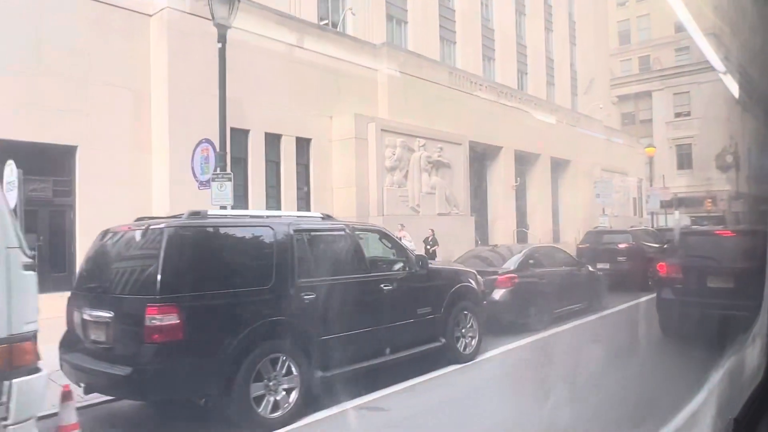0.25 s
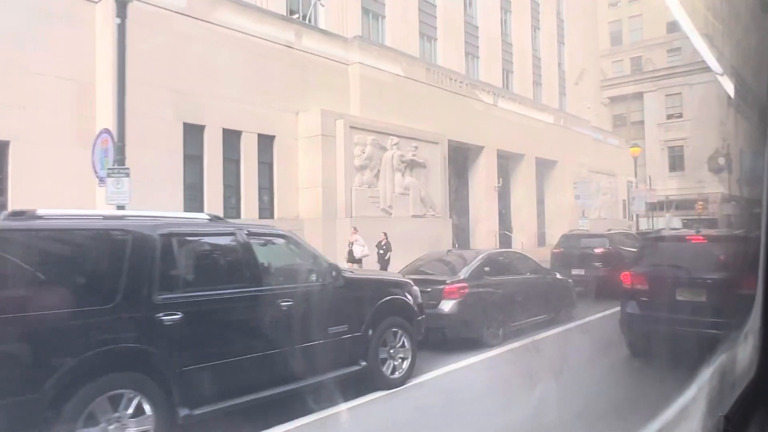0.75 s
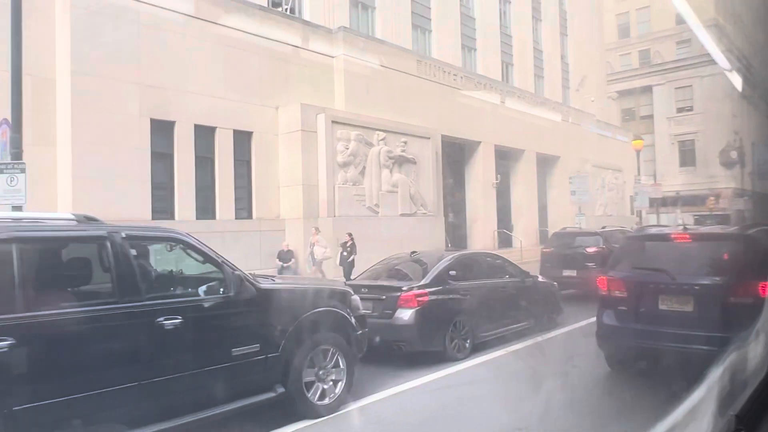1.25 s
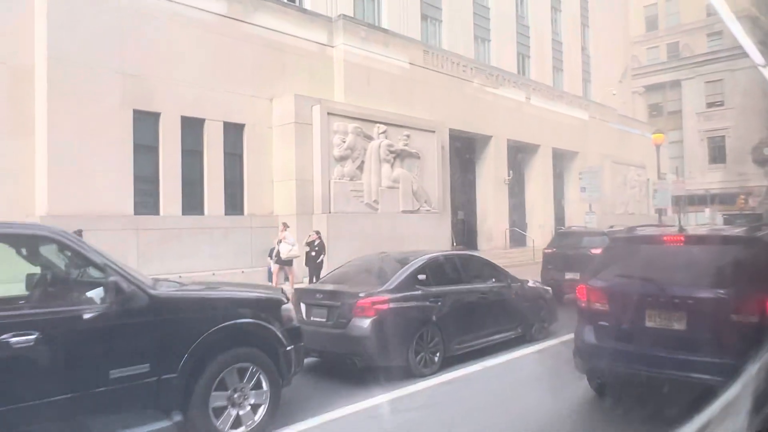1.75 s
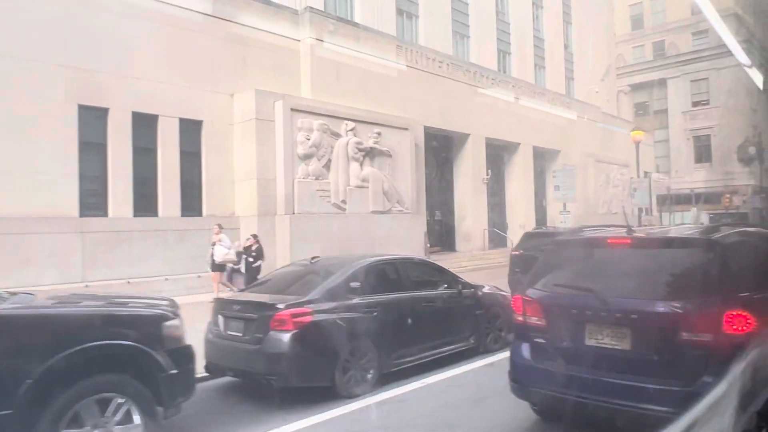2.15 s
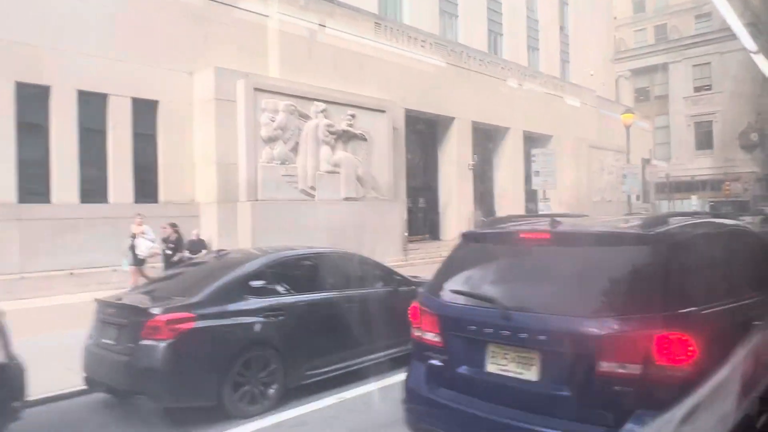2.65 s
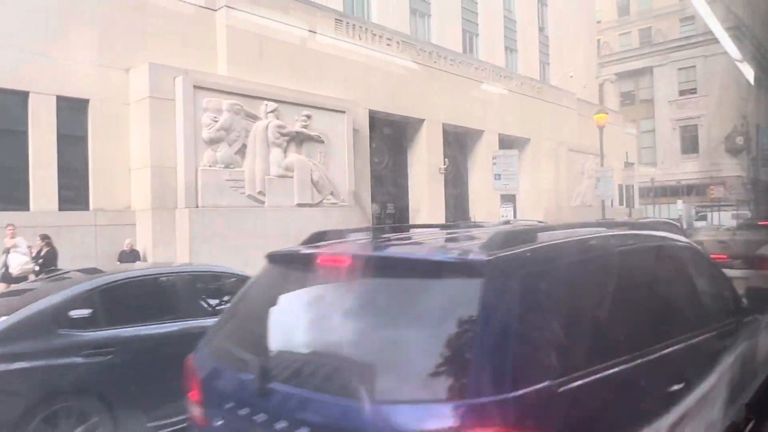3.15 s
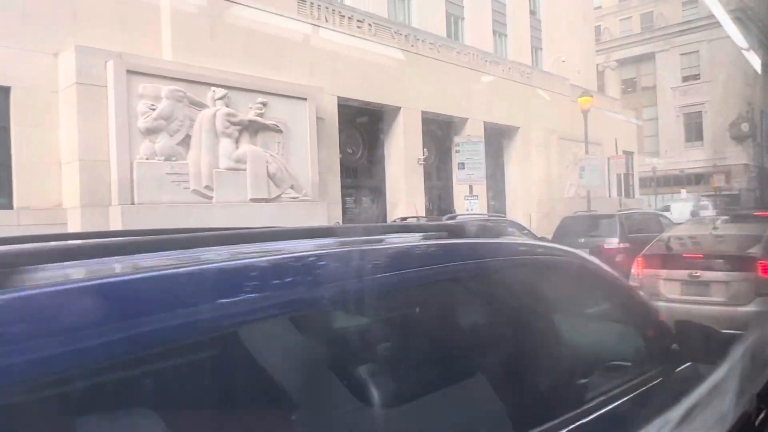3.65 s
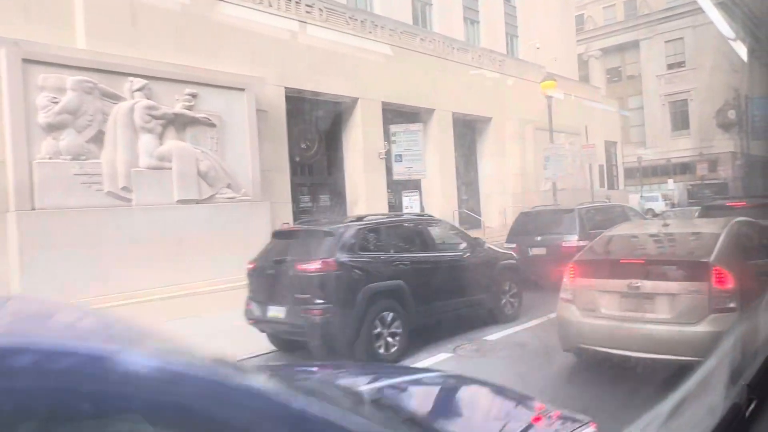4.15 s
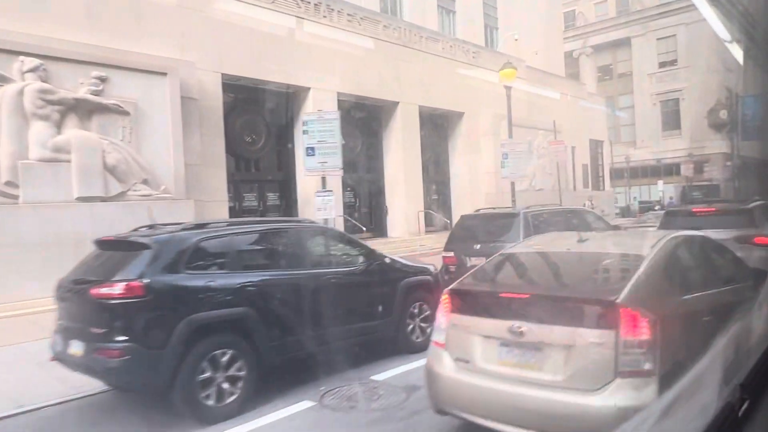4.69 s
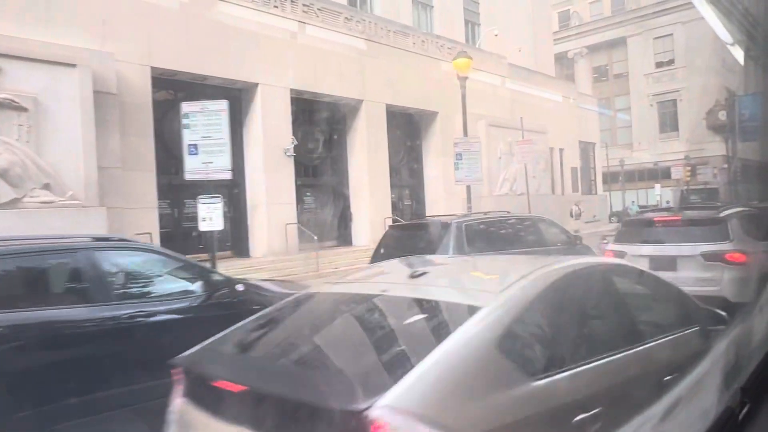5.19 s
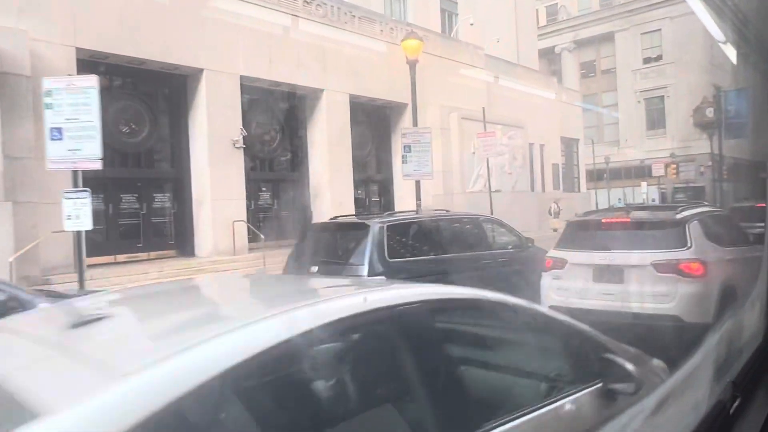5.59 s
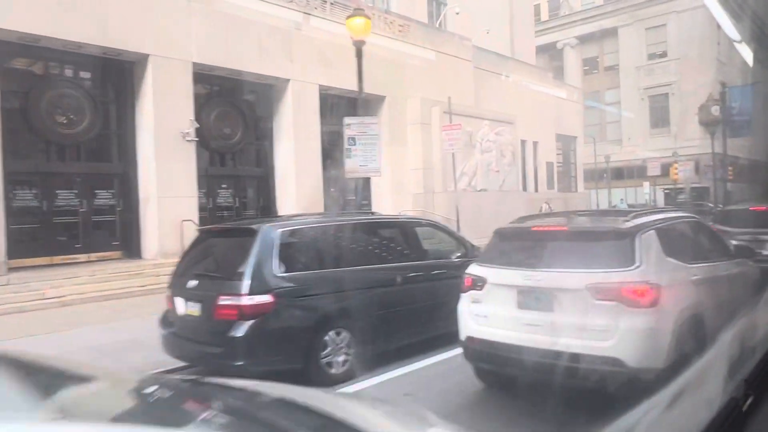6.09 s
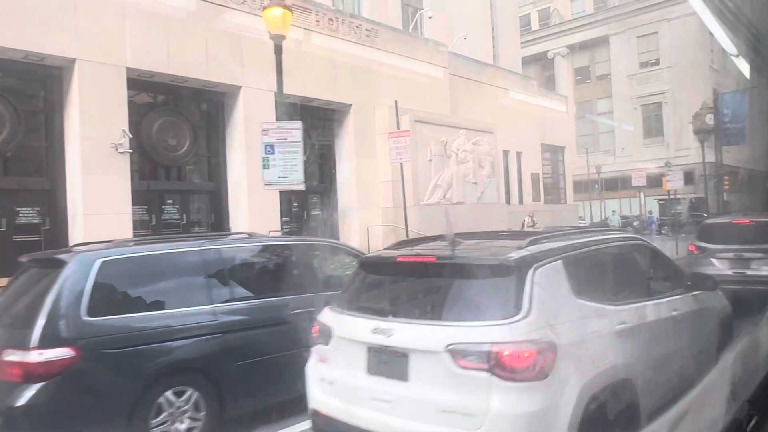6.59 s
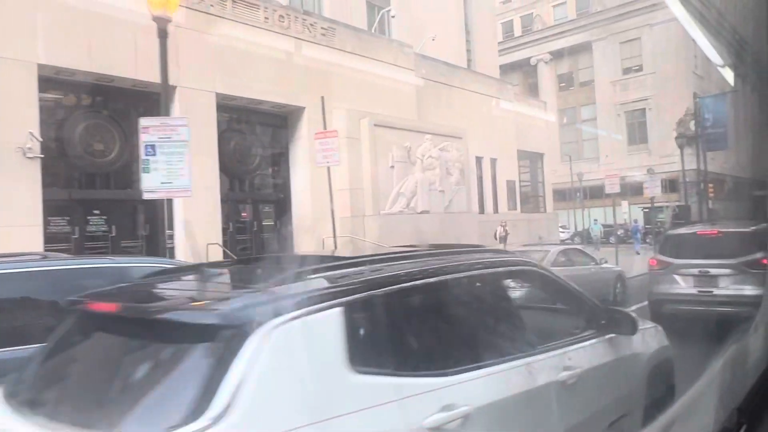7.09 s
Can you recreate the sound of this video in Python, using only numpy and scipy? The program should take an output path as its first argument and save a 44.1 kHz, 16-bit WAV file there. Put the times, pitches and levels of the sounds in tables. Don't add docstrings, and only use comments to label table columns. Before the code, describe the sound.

Deep bus engine rumble rises in pitch and loudness, peaks around the middle, then sinks away, with rattling panels and sizzling trim.

```python
import sys
import numpy as np
from scipy import signal
from scipy.fft import rfft, irfft, next_fast_len
from scipy.io import wavfile
from scipy.ndimage import uniform_filter1d

SR = 44100
rng = np.random.default_rng(int(sys.argv[2]) if len(sys.argv) > 2 else 0)


def store_wav(level_fs):
    pcm = np.round(np.clip(np.atleast_2d(level_fs), -1, 1) * 32767)
    wavfile.write(sys.argv[1], SR, pcm.T.astype(np.int16))


def natural_amplitude(level_db):
    exponent = np.asarray(level_db, float) / 20
    return 10 ** exponent


N = 323253
TIME = np.arange(N) / SR
SIZE = next_fast_len(N)
HZ = np.arange(SIZE // 2 + 1) * SR / SIZE + 1e-3


def curve(table):
    start_s, value = np.transpose(table)
    return np.interp(TIME, start_s, value)


def across(table):
    freq_hz, value = np.transpose(table)
    return np.interp(np.log(HZ), np.log(np.maximum(freq_hz, 1)), value)


def bumps(hz, modes):
    return sum(gain / np.sqrt(1 + (2 * (hz - centre) / width) ** 2) for centre, width, gain in modes)


def unit_rms(x):
    return x / np.sqrt(np.mean(x ** 2))


def walk(rate):
    hold = int(SR / rate)
    steps = np.repeat(rng.standard_normal(N // hold + 1), hold)
    return 2.02 * uniform_filter1d(uniform_filter1d(steps, hold), hold)[:N]


def tone(turns):
    return np.sqrt(2) * np.sin(2 * np.pi * (turns + rng.random((3, 1))))


def restless(x, gain, lo_hz, slow_db, quick_db, count):
    place = np.clip(1.5 * np.log2(HZ / lo_hz), 0, count - 1)
    spectrum = rfft(x, SIZE) * gain
    out = 0
    for k in range(count):
        overlap = np.sqrt(np.clip(1 - abs(place - k), 0, 1))
        band = irfft(spectrum * overlap, SIZE)[:, :N]
        out = out + natural_amplitude(slow_db * walk(5) + quick_db * walk(18)) * band
    return unit_rms(out)


def boom(hz, turns, rumble_db):
    load = curve([(0, -3.2), (1.2, -2.4), (1.5, -2), (1.85, -.5), (2.2, .2), (2.6, .2), (2.8, 1.7),
                  (3.05, 2.8), (3.4, 6.1), (3.7, 5.5), (4, .4), (4.6, 1.7), (5.2, 1), (5.5, -4.5),
                  (6.05, -1.6), (6.4, -2.7), (6.9, -1.3), (7.33, -1.2)])
    # sixths of the firing rate, level_db, follow (dB gained per dB of load)
    strong = [(6, -.3, .85), (9, -11.5, 2.9), (11, -7.8, 2), (12, .7, 3.4)]
    # sixths of the firing rate, level_db
    uneven = [(4, -23.5), (5, -15.5), (7, -11.5), (8, -14), (10, -6), (13, -9.5), (14, -5), (15, -18.5),
              (16, -14), (17, -12.5), (18, -3.5), (20, -14.5), (21, -5.5)]
    # freq_hz, width_hz, level_db, sign at the window
    long_modes = [(52.9, 5.3, -21.2, 1), (70.2, 7.8, -12.2, 1), (114.7, 18.8, -20.6, -1),
                  (125.3, 3.8, -16.7, -1), (147.9, 6.8, -28.7, 1)]
    # freq_hz, width_hz, level_db
    air_modes = [(65, 9.6, -1), (137.3, 15.7, 2.5), (196.4, 11, -4.5), (253, 25, -14), (315, 21, -21)]

    out = 0
    for sixth, level_db, follow in strong:
        order = sixth / 6
        response = 0
        for mode_hz, width_hz, mode_db, sign in long_modes:
            response = response + sign * natural_amplitude(mode_db) / (1 + 2j * (order * hz - mode_hz) / width_hz)
        gain = natural_amplitude(level_db + follow * load + .5 * walk(11)) * abs(response)
        out = out + gain * tone(order * turns)

    air = [(mode_hz, width_hz, natural_amplitude(mode_db)) for mode_hz, width_hz, mode_db in air_modes]
    for sixth, level_db in uneven:
        order = sixth / 6
        gain = natural_amplitude(level_db + rumble_db - 4 + 1.3 * load + walk(3.71)) * bumps(order * hz, air)
        out = out + gain * tone(order * turns)
    return out


def clatter(turns, db):
    # freq_hz, level_db per Hz
    spectrum = [(260, -14.5), (450, 1), (738, -7), (880, -7.5), (956, -10.5), (1300, -12.5), (2150, -20.5),
                (2820, -28.5), (7500, -40), (9750, -74.5), (16500, -120)]
    # freq_hz, width_hz, lift_db (negative is a dip)
    panels = [(557, 40, 3), (680, 40, -3), (720, 28, 2), (880, 40, -3), (950, 40, 4), (1190, 50, 3),
              (1380, 90, -5), (1465, 60, 5), (1690, 45, 3), (1880, 30, 3), (1965, 60, -4), (2090, 40, 6),
              (2160, 60, 7), (2365, 28, 3), (2580, 50, 4), (3150, 90, 3)]
    burst = 1 + 0.24 * np.exp(-(turns % 1) / 0.53)
    gain = natural_amplitude(across(spectrum) + 1.22 * bumps(HZ, panels))
    noise = burst * rng.standard_normal((3, N))
    return natural_amplitude(db + 6.5) * restless(noise, gain, lo_hz=541, slow_db=0.73, quick_db=1.02, count=6)


def rumble(db):
    # freq_hz, level_db per Hz
    spectrum = [(12, -43), (20, -22), (46, -8), (117, -4), (138, -2), (151, -12), (243, -9), (375, -18),
                (410, -19), (700, -51), (910, -62), (1540, -120)]
    # freq_hz, width_hz, lift_db
    walls = [(125, 14, 1.5), (192.2, 29, 7), (239.3, 9.5, 4.5), (293.7, 56, 4.5), (412.5, 67, 7.5)]
    gain = natural_amplitude(across(spectrum) + bumps(HZ, walls))
    noise = rng.standard_normal((3, N))
    return natural_amplitude(db + 3.5) * restless(noise, gain, lo_hz=61.2, slow_db=0.1, quick_db=1.07, count=5)


def gliding_hums():
    # start_s, length_s, from_hz, to_hz, level_db
    hums = [
        (-.1, .85, 158, 142, -30),
        (-.1, .95, 108, 94, -34),
        (2.7, .6, 149, 169, -23),
        (5.45, .6, 81, 66, -26),
        (2.12, .6, 59.5, 63, -21),
        (5.75, 1.2, 132, 116, -25),
        (6.85, .6, 169, 152, -30),
    ]
    out = 0
    for start_s, length_s, from_hz, to_hz, level_db in hums:
        part = np.clip((TIME - start_s) / length_s, 0, 1)
        hz = from_hz + (to_hz - from_hz) * part
        swell = np.sin(np.pi * part) * natural_amplitude(level_db + 1.5 * walk(8))
        out = out + swell * tone(np.cumsum(hz) / SR)
    return out


def ring(start_s, db, hz, rise_s, t60_s, rough, glide=0):
    out, start = np.zeros((3, N)), int(start_s * SR)
    t = np.arange(min(int(t60_s * SR), N - start)) / SR
    wobble = 1 + rough * uniform_filter1d(rng.standard_normal((3, 2 * SR)), size=12)[:, :len(t)]
    turns = np.cumsum(hz * wobble * 2 ** (glide * t), axis=1) / SR + rng.random((3, 1))
    shape = (1 - np.exp(-t / rise_s)) * np.exp(-np.log(1000) * t / t60_s)
    out[:, start:start + len(t)] = natural_amplitude(db) * shape * np.sin(2 * np.pi * turns)
    return out


def knocks():
    # start_s, level_db (peak), pitch_hz, t60_s, rough (0-1)
    parts = [(.2, -54, 13300, .1, .3), (.28, -48, 4800, .06, .8), (.83, -44, 3900, .22, .95),
             (.845, -53, 3400, .3, .3), (1.69, -46, 3250, .1, .5), (1.703, -37, 5200, .12, .9),
             (1.704, -39, 8500, .08, .9), (1.705, -37, 12500, .05, .6), (1.755, -43, 6000, .06, .2),
             (2.75, -48, 13200, .12, .3), (2.8, -47, 3150, .9, .3), (4.535, -52, 6200, .15, .08),
             (4.61, -48, 3070, .45, .2), (4.82, -43, 3550, .4, .4), (4.94, -48, 3450, .65, .07),
             (5.495, -42, 5100, .35, .4), (5.52, -43, 4620, .08, .12), (5.54, -42, 4620, .08, .12),
             (5.56, -46, 4560, .16, .15), (7.06, -48, 13800, .15, .3)]
    out = ring(1.66, db=-1, hz=74, rise_s=.12, t60_s=.7, rough=0, glide=-2.6)
    for start_s, level_db, pitch_hz, t60_s, rough in parts:
        rise_s = .12 * t60_s ** 1.63
        out = out + ring(start_s, level_db, pitch_hz, rise_s, t60_s, rough)
    return out


def jolts():
    # start_s, level_db, hold_s
    patches = [(0.13, -59, 0.054), (0.453, -61, .03), (.58, -62.5, 0.075), (0.835, -64.5, .06),
               (0.97, -66.5, 0.025), (1.477, -55, 0.038), (1.708, -50, 0.039), (1.961, -56, .04),
               (2.161, -47.5, 0.073), (2.44, -49.5, 0.062), (2.604, -58.5, .12), (2.758, -51, 0.27),
               (3.16, -56.5, 0.11), (3.291, -46.5, 0.18), (3.494, -53.5, 0.21), (3.836, -52, 0.013),
               (3.898, -56.5, 0.27), (4.216, -54.5, 0.11), (4.411, -56.5, 0.027), (4.7, -63.5, 0.17),
               (4.96, -63, 0.17), (5.36, -61, 0.18), (5.69, -62, .01), (5.815, -57, .3), (6.197, -65, .02),
               (6.296, -60, 0.13), (6.53, -56, .04), (6.856, -55.5, 0.086), (6.988, -50, 0.086),
               (7.12, -53, 0.15)]
    quiet_db, rise_db_per_s, fall_db_per_s = -63.5, 219, 134
    power = natural_amplitude(quiet_db) ** 2
    for start_s, level_db, hold_s in patches:
        early = np.maximum(start_s - TIME, 0)
        late = np.maximum(TIME - start_s - hold_s, 0)
        power = power + natural_amplitude(level_db - rise_db_per_s * early - fall_db_per_s * late) ** 2
    return 10 * np.log10(power)


def trim(db):
    # freq_hz, level_db per Hz
    spectrum = [(800, -30.5), (2000, -8), (3500, -3), (5500, -3), (7000, -2), (8000, 0), (9500, 0),
                (11000, -1), (12500, -8.5), (14000, -5), (15700, -12.5)]
    size_db = 2.5 * np.minimum(rng.exponential(size=N), 6)
    clicks = rng.standard_normal((3, N)) * natural_amplitude(size_db)
    decay = np.exp(-1 / (.0006 * SR))
    tail = signal.lfilter([1 - decay], [1, -decay], abs(clicks)) * rng.standard_normal((3, N))
    sizzle = irfft(rfft(clicks + .5 * tail, SIZE) * natural_amplitude(across(spectrum)), SIZE)[..., :N]
    return natural_amplitude(db + 2.5 + walk(30)) * unit_rms(sizzle)


def ports(paths):
    # freq_hz, lag_rad (left behind right)
    lag = [(70, .1), (130, .45), (380, .6), (800, -2.2), (1100, -1.8), (1700, -3.7), (2250, -5.1),
           (4000, -6.3), (7000, -3), (8300, .1), (10100, 3.14), (12200, 6.28), (13800, 9.42),
           (15500, 12.56)]
    # freq_hz, level_db (left minus right)
    lean = [(60, 0), (110, 1.5), (200, 0), (380, -1), (700, -2.0), (1290, -2.5), (2380, -6.5), (4400, -1),
            (8120, -1.0), (15000, -2)]
    # freq_hz, share of power common to both (0-1)
    coherence = [(60, 1), (300, 0.95), (480, 0.41), (750, 0.38), (1250, 0.052), (1600, 0.24), (2120, 0.72),
                 (2450, 0.11), (6000, 0.051), (8000, 0.93), (10000, 0.86), (15000, 0.7)]
    common, *own = rfft(paths, SIZE)
    share = np.clip(across(coherence), 0, 1)
    side = np.array([[.5], [-.5]])
    shared = np.sqrt(share) * common * np.exp(-1j * side * across(lag))
    separate = np.sqrt(1 - share) * np.array(own)
    return irfft((shared + separate) * natural_amplitude(side * across(lean)), SIZE)[:, :N]


def scene():
    hz = curve([(0, 33.2), (1.28, 32.3), (1.47, 35.3), (1.65, 40.5), (1.83, 49.9), (2.2, 59.7),
                (2.38, 59.6), (2.75, 65), (3.12, 73.5), (3.48, 79.9), (3.67, 78.9), (4.03, 70.9),
                (4.22, 68.8), (4.58, 67.6), (5.32, 66.4), (5.68, 55.9), (5.87, 53), (7.33, 37.1)])
    throttle = curve([
        (0, 0.07),
        (1.3, 0.4),
        (1.62, 0.97),
        (3.9, 0.88),
        (4.0, 0.4),
        (5.2, 0.42),
        (5.3, .1),
        (5.75, 0.05),
        (7.33, .01),
    ])
    turns = np.cumsum(hz) / SR
    shake_db = jolts()
    rumble_db = -28.5 + 0.4345 * TIME + 6.5 * throttle ** 2
    knock_db = -48 + 3 * np.log2(hz / 35.6) + 5 * throttle
    clatter_db = 20 * np.log10(np.hypot(natural_amplitude(knock_db), natural_amplitude(shake_db + 0.5)))
    engine = boom(hz, turns, rumble_db) + clatter(turns, clatter_db)
    body = rumble(rumble_db) + gliding_hums() + knocks() + trim(shake_db)
    return ports(engine + body)


def band_limit(x):
    return signal.sosfilt(signal.butter(12, 17090, fs=SR, output="sos"), x)


def record(dry):
    loud = 1.075 * dry
    heard = loud / (1 + (loud / .95) ** 6) ** (1 / 6)
    return band_limit(heard)


dry = scene()
out = record(dry)
store_wav(out)
```